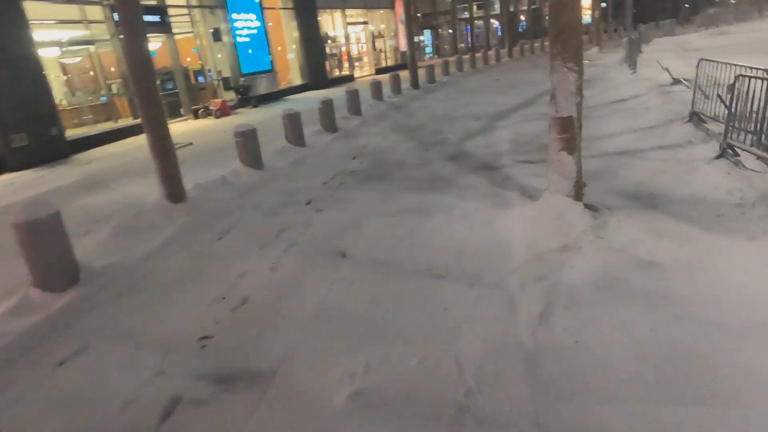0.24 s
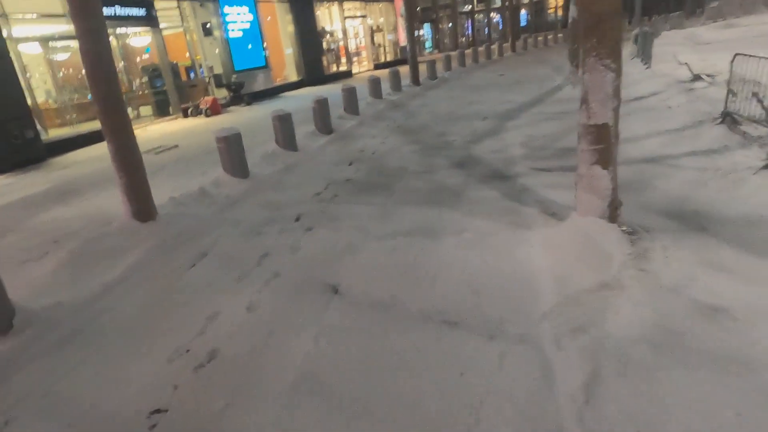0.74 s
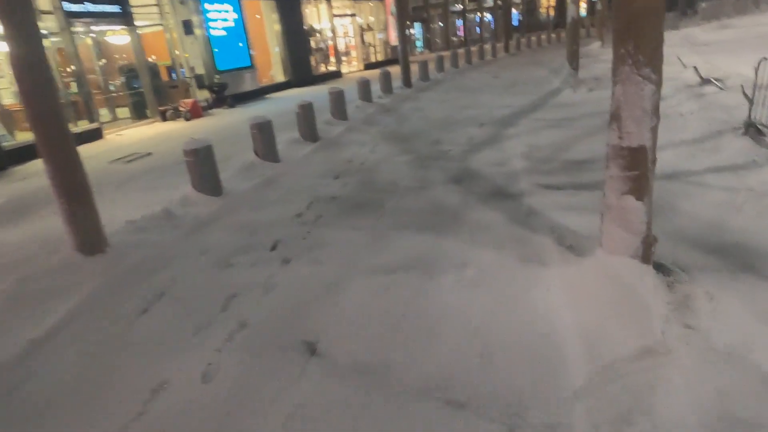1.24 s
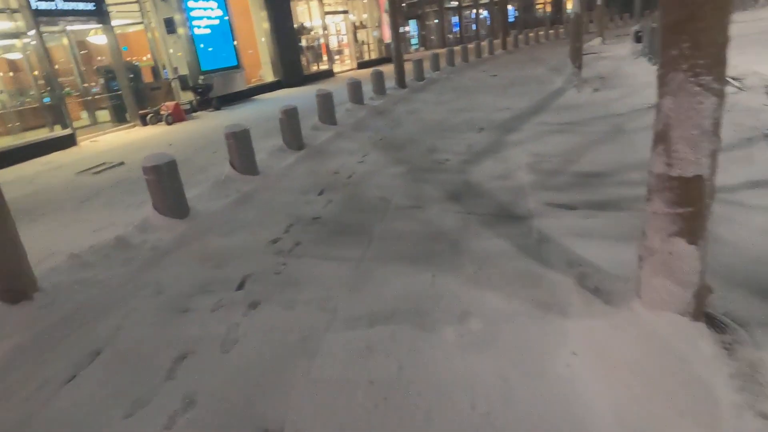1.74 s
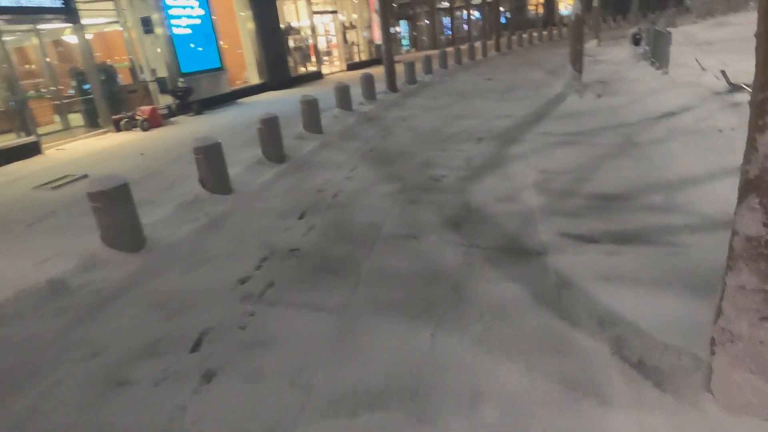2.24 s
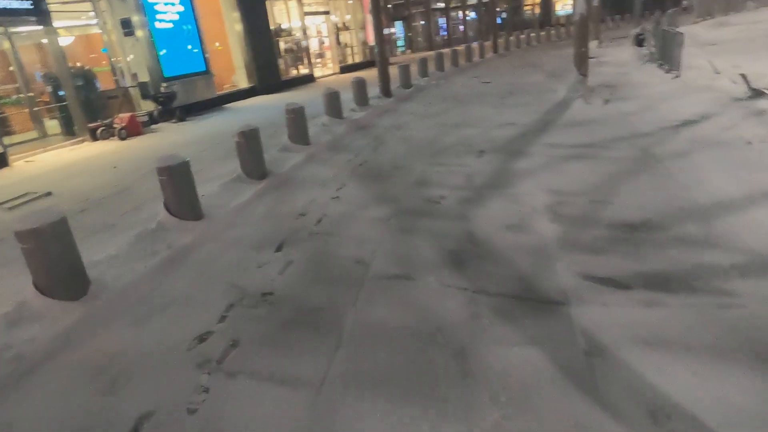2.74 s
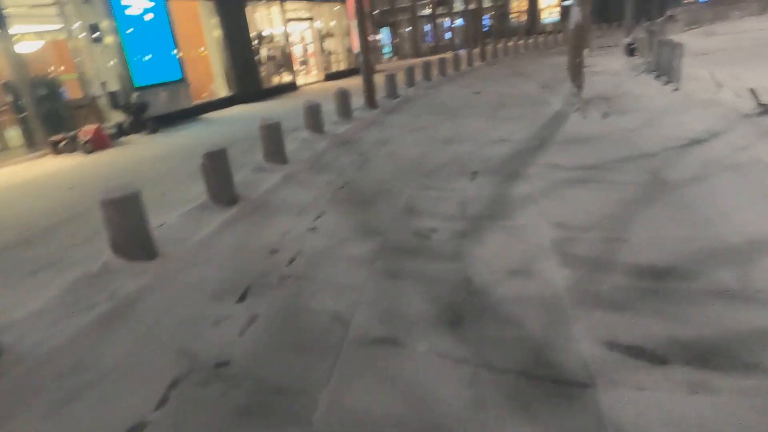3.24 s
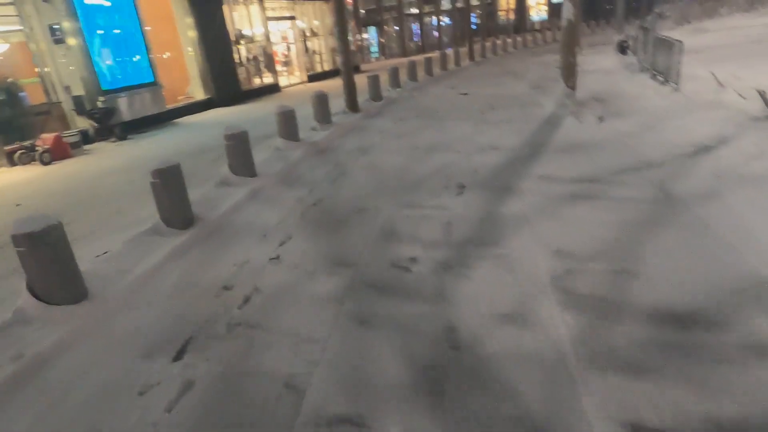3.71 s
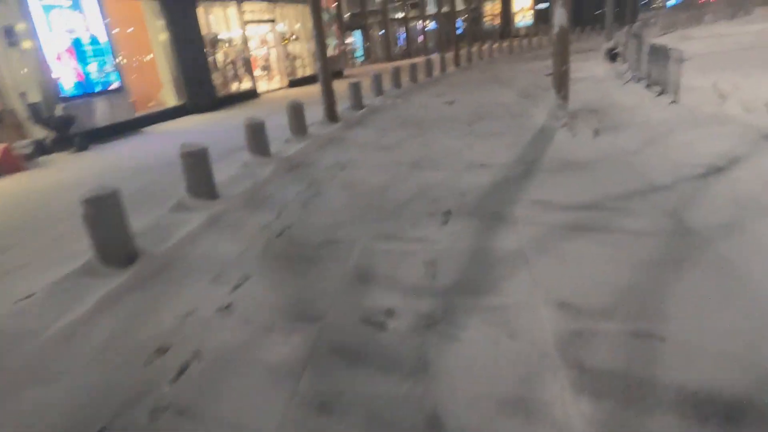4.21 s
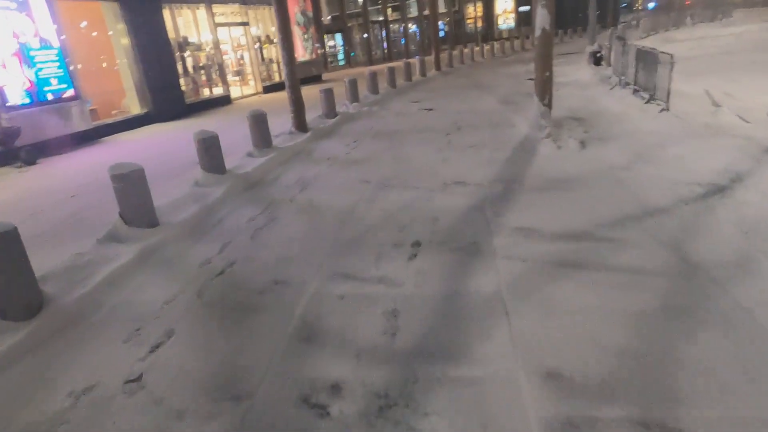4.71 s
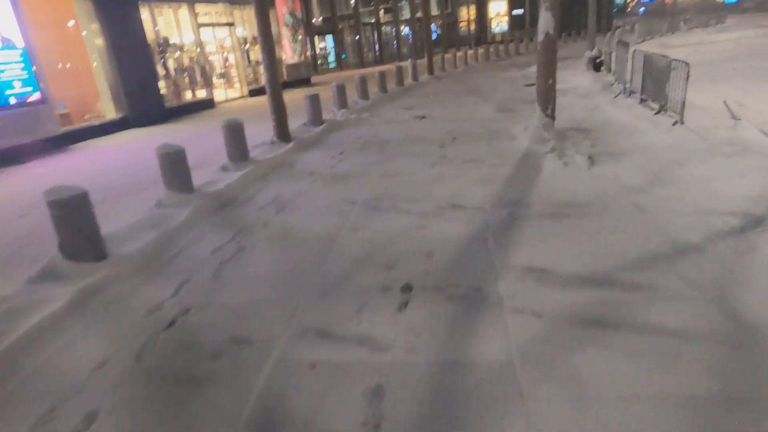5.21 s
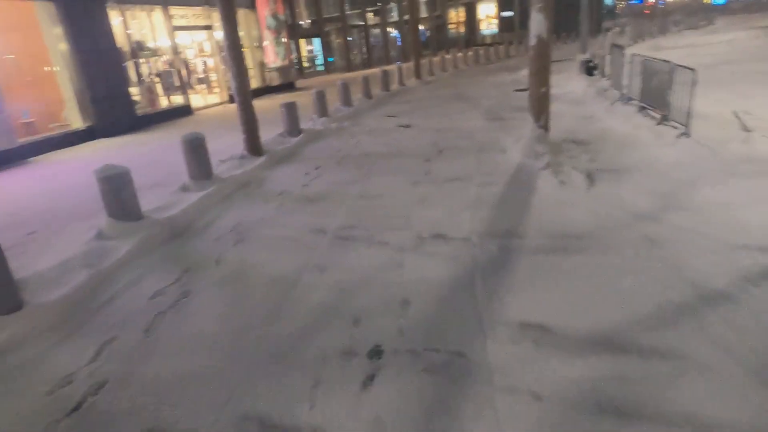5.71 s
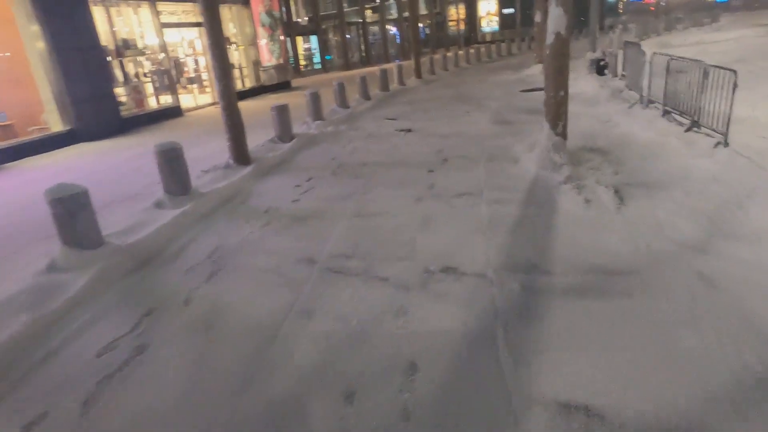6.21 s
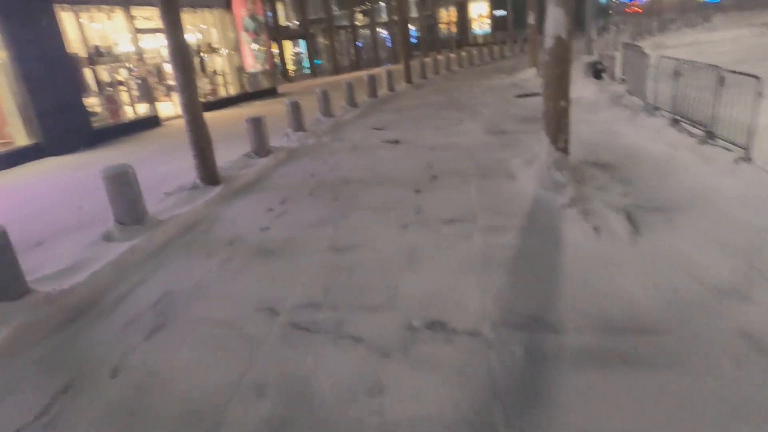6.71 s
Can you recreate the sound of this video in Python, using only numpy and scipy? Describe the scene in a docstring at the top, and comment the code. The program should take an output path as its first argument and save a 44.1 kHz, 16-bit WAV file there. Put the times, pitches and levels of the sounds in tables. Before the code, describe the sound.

Handheld stereo microphone, very close to the walker, outdoors on a quiet snowy street. Sub-bass thumps and rumble mark every half-second footfall, with smaller jolts between. Bright irregular clicks of breaking ice grains and soft powdery hiss fill the gaps, densest in the first four seconds, sparser around five, then livelier again. Distant city air stays barely audible.

```python
"""Someone walks over a snowy pavement on a quiet night street, microphone in hand.
In each stride the free foot first scuffs the snow and the moving hand rumbles; the footfall then jolts
the resonant grip with a deep thump, the sole crunches the snow, the heel knocks and the hand shakes.
Between footfalls come lesser jolts. Icy grains snap as filtered pulses and packed snow creaks in
decaying modes throughout, over shaped noise for the faint murmur of the city."""
import sys
import numpy as np
from scipy import signal
from scipy.fft import rfft, irfft, next_fast_len
from scipy.io import wavfile
from scipy.ndimage import uniform_filter1d

SR = 44100
rng = np.random.default_rng(int(sys.argv[2]) if len(sys.argv) > 2 else 0)


def store_wav(level_fs):
    """Save 16-bit WAV to argv[1]."""
    pcm = np.round(np.clip(np.atleast_2d(level_fs), -1, 1) * 32767)
    wavfile.write(sys.argv[1], SR, pcm.T.astype(np.int16))


N = 306495
TIME = np.arange(N) / SR

# Footfalls. Each row: time in seconds, thump level in dB, thump pitch in Hz, hand sway in dB, scuff of the
# swinging foot in dB, crunch under the sole in dB, heel knock in dB before a common gain,
# time constant of the thump's swell in seconds, shudder of the grip in dB.
FOOTFALLS = [(-0.022, -13, 27, -26.5, -59.5, -57.5, -36, 0.012, -25),
             (0.489, -8.5, 31.2, -35.5, -55, -53.5, -28, 0.014, -34),
             (1.011, -9.5, 33, -34, -65, -64, -32.5, 0.015, -30),
             (1.533, -7.5, 32, -33.5, -56.5, -58.5, -29.5, 0.014, -27.5),
             (2.036, -10, 29.2, -34.5, -65, -64, -36, 0.015, -32),
             (2.543, -9.5, 30.9, -30, -68, -64.5, -29.5, 0.014, -30),
             (3.048, -10, 29.8, -41, -57.5, -63, -33, .015, -24.5),
             (3.574, -10, 31.2, -36.5, -60.5, -59.5, -30.5, 0.015, -27),
             (4.086, -11, 28, -38, -65.5, -62.5, -38, 0.015, -28),
             (4.585, -8, 29.2, -29, -66, -67.5, -28.5, 0.013, -21.5),
             (5.069, -11.5, 31.1, -37.5, -72, -69, -39.5, 0.015, -26),
             (5.585, -8, 30.8, -32.5, -72.5, -61.5, -28.5, .015, -32),
             (6.081, -11.5, 27.9, -36, -68, -61, -32.5, 0.017, -28),
             (6.596, -8.5, 29.87, -39.5, -65, -57, -28, 0.016, -29.5)]
# Colour of close sounds in each microphone port. Each row: frequency in Hz, relative gain in dB.
LEFT_COLOUR = [(150, -25.5), (400, -9.5), (750, -6), (1000, 5.5), (1300, 15), (1800, 3), (2300, 2.5),
               (2900, 7), (4000, 4.5), (5500, -2), (7500, -5.5), (10000, -22), (12400, -19), (15500, -39)]
RIGHT_COLOUR = [(150, -10), (400, -9), (750, -7), (1000, -2), (1250, 10.5), (2000, 7.5), (3500, 9),
                (4500, 2.5), (6500, -9.5), (8800, -26), (12400, -24), (15500, -27.5)]
# Spectrum of handling rumble. Each row: frequency in Hz, relative density in dB per Hz.
HANDLING_COLOUR = [(12, -7.5), (22, 12), (34, 5.5), (52, -3), (80, -16), (120, -26.5), (200, -48),
                   (350, -53), (700, -61), (2000, -100)]
# Small breaks and slips follow the crunch: dB of rate or level per dB of crunch above the usual.
USUAL_CRUNCH_DB, RATE_FOLLOWS, LEVEL_FOLLOWS = -60.0, 0.62, 0.38


def from_db(db):
    """Amplitude ratio of a level in decibels."""
    return 10 ** (np.asarray(db) / 20)


def rms_one(x):
    """Normalise the root-mean-square value to one."""
    return x / np.sqrt(np.mean(x ** 2) + 1e-20)


def at_hz(points, hz):
    """Interpolate a spectrum along a logarithmic frequency axis."""
    f, value = np.transpose(points)
    return np.interp(np.log(np.maximum(hz, 1)), np.log(f), value)


def causal(gain):
    """Minimum-phase impulse response: folding the cepstrum forward makes a magnitude response causal."""
    cepstrum = irfft(np.log(gain))
    half = len(cepstrum) // 2
    cepstrum[1:half] *= 2
    cepstrum[half + 1:] = 0
    return irfft(np.exp(rfft(cepstrum)))[:half]


def colour(x, points, size=2048):
    """Linear filtering by convolution, with unit mean power gain."""
    gain = rms_one(from_db(at_hz(points, np.fft.rfftfreq(size, 1 / SR))))
    return signal.oaconvolve(x, causal(gain))[:N]


def noise(points):
    """Stationary Gaussian noise of unit rms, shaped in the frequency domain."""
    size = next_fast_len(N, True)
    gain = from_db(at_hz(points, np.fft.rfftfreq(size, 1 / SR)))
    return rms_one(irfft(rfft(rng.standard_normal(size)) * gain, size)[:N])


def drift(rate):
    """Slow random modulation of unit rms: noise averaged twice over 1 / rate seconds."""
    width = max(1, int(SR / rate))
    averaged = uniform_filter1d(rng.standard_normal(N), width)
    return rms_one(uniform_filter1d(averaged, width))


def add(out, s, sound):
    """Superpose a sound from time s, clipped to the length of the output."""
    start = int(round(s * SR))
    first, last = max(start, 0), min(start + sound.shape[-1], N)
    if last > first:
        out[..., first:last] += sound[..., first - start:last - start]


def pan_gains(pan_db):
    """Level difference between ports, positive to the left, at constant total power."""
    return rms_one(from_db([pan_db / 2, -pan_db / 2]))


def place(pair, pan_db, lag_s=.00058):
    """Level and arrival-time difference: the port nearer to a sound hears it louder and earlier."""
    # every off-centre sound has the same lag
    lag = int(round(lag_s * SR)) if pan_db else 0
    lags = (lag, 0) if pan_db < 0 else (0, lag)
    return np.array([g * np.pad(x, (d, lag - d)) for x, g, d in zip(pair, pan_gains(pan_db), lags)])


def phase_power(phase, times, levels_db):
    """Powers add: one stride phase with linear attack, hold and release at every footfall."""
    start, *lengths = phase
    corners = start + np.cumsum([0, *lengths])
    return sum((from_db(db) * np.interp(TIME, s + corners, [0, 1, 1, 0])) ** 2
               for s, db in zip(times, levels_db))


def thumps(lead_s=0.0366, order=4, early_s=0.013, sag_hz_per_s=35):
    """Transient response of a resonator: each footfall swells and dies in the soft arm and grip."""
    out, t = np.zeros(N), TIME[:SR // 3]
    since = t - early_s - lead_s   # time from a crest of the wave
    for s, db, hz, *_, swell_s, _ in FOOTFALLS:
        envelope = (t / (order * swell_s)) ** order * np.exp(order - t / swell_s)
        # the pitch sags as the grip relaxes
        cycles = (hz - .5 * sag_hz_per_s * since) * since
        add(out, s - early_s, from_db(db) * envelope * np.cos(2 * np.pi * cycles))
    return out


def shudders(after_s=0.0377, width_s=0.027, hz=52, spread_db=1.2):
    """A second, stiffer resonance of the grip: a Gaussian burst at a slightly different pitch each time."""
    out, t = np.zeros(N), TIME[:SR // 5] - .1
    envelope = np.exp(-.5 * (t / width_s) ** 2)
    for s, *_, db in FOOTFALLS:
        pitch = hz * from_db(rng.normal(0, spread_db))   # spread as 20 log10 of the frequency ratio
        add(out, s + after_s + t[0], from_db(db) * envelope * np.cos(2 * np.pi * pitch * t))
    return out


def heels(after_s=.027, hz=84, t60=0.12, gain_db=5.0, rise_s=0.0024, knock_db=-15.0):
    """Impact on a stiff surface: once the snow is pressed flat, the heel meets the pavement."""
    # Spectrum of the dull knock. Each row: frequency in Hz, relative density in dB per Hz.
    knock_colour = [(50, 9.5), (120, -7.5), (250, -7.5), (500, -22), (900, -21), (2000, -61)]
    out, t = np.zeros(N), TIME[:SR // 5]
    envelope = (1 - np.exp(-t / rise_s)) * from_db(-60 * t / t60)
    knocks = np.array_split(from_db(knock_db) * noise(knock_colour), len(FOOTFALLS))
    for (s, *_, heel_db, _, _), knock in zip(FOOTFALLS, knocks):
        pitch = hz * from_db(rng.normal(0, 1.0))
        blow = np.sin(2 * np.pi * pitch * t) + knock[:len(t)]
        add(out, s + after_s, from_db(heel_db + gain_db) * envelope * blow)
    return out


def bumps(width_s=0.023, gain_db=-3.0, rattle_db=-9.5):
    """Short excitation of a resonance: feet rolling and pushing off rock the grip, with a little rumble."""
    # Each row: time of the height in seconds, level in dB before a common gain, pitch in Hz.
    lesser_jolts = [(0.113, -18, 28.6), (0.426, -24, 29.4), (0.648, -28, 34.3), (0.849, -24.5, 31.7),
                    (1.181, -33.5, 29.2), (1.366, -24, 32.6), (1.457, -27.5, 36.3), (1.908, -26, 31.2),
                    (2.164, -17.5, 27.92), (2.226, -24.5, 28.8), (2.406, -24.5, 36.2), (2.707, -26, 27.8),
                    (3.013, -25, 26.2), (3.23, -34, 30.4), (3.501, -23.5, 29.6), (4.293, -22, 29.4),
                    (4.495, -21, 34), (5.261, -28, 30.2), (5.449, -27.5, 28.3), (5.755, -19.5, 29.03),
                    (5.926, -35, 31.5), (5.996, -25, 25.7), (6.273, -27.5, 27.6), (6.561, -23.5, 28.4)]
    out, t = np.zeros(N), TIME[:SR // 5] - .1
    envelope = np.exp(-.5 * (t / width_s) ** 2)
    rumbles = np.array_split(from_db(rattle_db) * noise(HANDLING_COLOUR), len(lesser_jolts))
    for (s, db, hz), rumble in zip(lesser_jolts, rumbles):
        rocking = np.cos(2 * np.pi * (hz * t + rng.random())) + rumble[:len(t)]
        add(out, s + t[0], from_db(db + gain_db) * envelope * rocking)
    return out


def sway(own_db=-14.5, gain_db=-1.5, settle_db=-14.5, rest_db=-41):
    """Amplitude-modulated handling noise: it rises as the arm swings and as it settles after each jolt."""
    # Each: start relative to the footfall, attack, hold and release, all in seconds.
    arm_swing = (-0.236, 0.085, 0.13, 0.32)
    arm_settle = (0, 0.02, 0.06, .16)
    s, thump_db, _, swing_db, *_ = np.transpose(FOOTFALLS)
    power = phase_power(arm_swing, s, swing_db) + phase_power(arm_settle, s, thump_db + settle_db)
    rumble = noise(HANDLING_COLOUR)
    # divide out the noise's own slow swells
    evened = rumble / np.sqrt(np.abs(uniform_filter1d(rumble ** 2, SR // 10)) + 1e-9)
    # moving air pushes on the two ports a little differently
    pair = evened + from_db(own_db) * noise(HANDLING_COLOUR) * [[1], [-1]]
    return from_db(gain_db) * pair * np.sqrt(power + from_db(rest_db) ** 2)


def crunch_level():
    """Energy sum of the work on the snow, in dB: a scuff before each footfall and a press that fades."""
    # Each: start relative to the footfall, attack, hold and release, all in seconds.
    foot_swing = (-0.25, .1, 0.07, .14)
    sole_press = (-0.041, .05, 0.04, .14)
    # Crunch that goes on between strides. Each row: time in seconds, level in dB.
    loose_snow = [(0.2, -70.5), (.6, -61), (.76, -69), (0.9, -63), (1.05, -67), (1.25, -61), (1.7, -61),
                  (2.1, -65.5), (2.7, -69), (2.82, -60), (2.97, -58), (3.2, -65), (3.4, -62), (3.85, -66),
                  (4.1, -62), (4.42, -63), (4.7, -77), (6.3, -76), (6.5, -64), (6.9, -67)]
    s, _, _, _, scuff_db, press_db, *_ = np.transpose(FOOTFALLS)
    strides = phase_power(foot_swing, s, scuff_db) + phase_power(sole_press, s, press_db)
    loose_db = np.interp(TIME, *np.transpose(loose_snow))
    return 10 * np.log10(strides + from_db(loose_db) ** 2)


def crunch(crunch_db, per_s=150, size_db=8.0, grains_db=-3.0, powder_db=-3.5, clump_db=4.0,
           crumble_s=0.0004):
    """Shot noise: countless tiny breaks, in clumps, over the smooth hiss of shifting powder."""
    # Loose powder is duller than breaking grains. Each row: frequency in Hz, relative level in dB.
    powder_colour = [(350, -2.5), (620, 12.5), (1000, 1), (1500, 4), (2200, 4), (3100, -2), (5500, -3),
                     (9000, -0.5), (15000, -7.5)]
    born = rng.random((2, N)) < per_s / SR
    sizes = from_db(size_db * np.minimum(rng.exponential(1, N), 3))
    decay = np.exp(-1 / (crumble_s * SR))
    breaks = signal.lfilter([1], [1, -decay], born * sizes + 1e-18)
    # each break is near one port and reaches the other more weakly
    grains = rms_one((breaks + .5 * breaks[::-1]) * rng.standard_normal((2, N)))
    powder = np.array([noise(powder_colour), noise(powder_colour)])
    level = from_db(crunch_db + clump_db * drift(55))
    return level * (from_db(grains_db) * grains + from_db(powder_db) * powder)


def give_way(per_s, crunch_db, count, clump_db=5.0, clumps_per_s=22):
    """Accumulated strain: snow gives way in little clusters, sooner the harder it is worked (samples)."""
    pace_db = RATE_FOLLOWS * (crunch_db - USUAL_CRUNCH_DB) + clump_db * drift(clumps_per_s)
    strain = np.cumsum(per_s * from_db(pace_db)) / SR
    return np.searchsorted(strain, np.arange(count) + rng.uniform(0, 1.8, count))


def small_grains(crunch_db, per_s=52.0, usual_db=-30, spread_db=4.5, tilt_db=-2.5, tilt_spread_db=1.5,
                 pan_db=-1, pan_spread_db=3, low_hz=2800, high_hz=7800, count=700):
    """Random fracture under strain: small grains break one by one, as rows for ticks()."""
    ring_hz = low_hz * (high_hz / low_hz) ** rng.random(count)
    at = give_way(per_s, crunch_db, count)
    strength = rng.uniform(-1, 1, count)
    tilt, pan = rng.standard_normal((2, count))
    level_db = usual_db + LEVEL_FOLLOWS * (crunch_db - USUAL_CRUNCH_DB)
    return [(i / SR, level_db[i] + spread_db * strength[k], tilt_db + tilt_spread_db * tilt[k],
             ring_hz[k], pan_db + pan_spread_db * pan[k]) for k, i in enumerate(at) if i < N]


def ticks(grains, gain_db=-1.48, crumble_db=6.0, crumble_t60=0.015, clean_per_db=1.02, ring_db=6.5,
          ring_octaves=0.37, ripple_db=1.77, size=1024):
    """Impulse response: a grain breaks with a sharp pulse and brief crumble, and rings at its own pitch."""
    out, t = np.zeros((2, N)), TIME[:size]
    hz = np.fft.rfftfreq(size, 1 / SR) + 1
    ports = np.array([rms_one(from_db(at_hz(port, hz))) for port in (LEFT_COLOUR, RIGHT_COLOUR)])
    octaves = np.log2(np.clip(hz, 1200, 9000) / 3100)
    knots = np.linspace(octaves[0], octaves[-1], 16)
    for s, db, tilt_db, ring_hz, pan_db in grains:
        crumble = rng.standard_normal((2, size)) * from_db(-60 * t / crumble_t60)
        crumble /= np.linalg.norm(crumble, axis=1, keepdims=True)
        # grains right next to a port are nearly pure pulses
        burst = crumble * from_db(crumble_db - clean_per_db * abs(pan_db)) + (t == 0)
        # each grain has its own brightness, resonance and random ripple
        resonance = np.exp(-.5 * (np.log2(hz / ring_hz) / ring_octaves) ** 2)
        ripple = np.interp(octaves, knots, rng.standard_normal(len(knots)))
        shape = from_db(tilt_db * octaves + ring_db * resonance + ripple_db * ripple)
        pair = [signal.fftconvolve(b, causal(port * shape)) for b, port in zip(burst, ports)]
        snap = place(pair, pan_db)
        # the level sets the mean energy of the two ports
        add(out, s, from_db(db + gain_db) * snap * np.sqrt(2) / np.linalg.norm(snap))
    return out


def small_creaks(crunch_db, per_s=5.0, usual_db=-50, spread_db=1.0, usual_hz=1400, pitch_spread_hz=90,
                 pan_spread_db=1.0, t60=0.0084, count=90):
    """Stick-slip by chance: faint slips, more frequent as the snow is worked, as rows for creaks()."""
    at = give_way(per_s, crunch_db, count)
    level_db = usual_db + LEVEL_FOLLOWS * (crunch_db - USUAL_CRUNCH_DB)
    return [(i / SR, level_db[i] + spread_db * size, usual_hz + pitch_spread_hz * pitch,
             pan_spread_db * pan, t60)
            for i, (size, pitch, pan) in zip(at, rng.standard_normal((count, 3))) if i < N]


def creaks(slips, gain_db=-5.0, rise_s=0.0017, rough=0.092, lag_s=0.00013):
    """Modal synthesis: packed snow slips and a few close, hollow modes ring out."""
    # Each row: multiple of the creak's pitch, relative level in dB.
    creak_modes = [(.9, -14.5), (0.999, -4), (1.14, -17.5), (1.35, -17.5)]
    out, t = np.zeros((2, N)), TIME[:SR // 10]
    for s, db, hz, pan_db, t60 in slips:
        tone = sum(from_db(mode_db) * np.sin(2 * np.pi * hz * ratio * t + rng.normal(0, 1.0))
                   for ratio, mode_db in creak_modes)
        grit = rms_one(uniform_filter1d(rng.standard_normal((2, len(t))), SR // 1500))
        envelope = (1 - np.exp(-t / rise_s)) ** 2 * from_db(-60 * t / max(t60, .005))
        ring = tone * (1 + rough * grit) * envelope
        # scaled by the spread of the first 12 ms
        left, right = ring / np.std(ring[:, :SR * 12 // 1000]) * from_db(db + gain_db)
        left_gain, right_gain = pan_gains(pan_db)
        add(out[0], s, left_gain * left)
        add(out[1], s + lag_s, right_gain * right)
    return signal.sosfilt(signal.butter(4, 900, "high", fs=SR, output="sos"), out)


def squeaks(crunch_db, per_s=70, t60=0.014, low_hz=1080, high_hz=1900):
    """Impulse-driven two-pole resonators: many tiny slips in the crunch ring at hollow pitches."""
    out, pitches = np.zeros((2, N)), np.geomspace(low_hz, high_hz, 7)
    r = from_db(-60 / (t60 * SR))   # pole radius
    for hz in pitches:
        slips = np.zeros((2, N))
        at = rng.integers(0, N, int(per_s * N / SR / len(pitches)))
        slips[:, at] = rng.standard_normal((2, len(at)))
        poles = [1, -2 * r * np.cos(2 * np.pi * hz / SR), r * r]
        out += signal.lfilter([1, 0, -1], poles, slips + 1e-18) / hz
    return rms_one(out) * from_db(crunch_db)


def street(level_db=-56.5, waver_db=1.0):
    """Interchannel correlation: far city murmur, alike in the bass and partly opposed in the treble."""
    # Each row: frequency in Hz, relative density in dB per Hz.
    street_colour = [(60, -16), (120, -7), (200, -13), (320, -21), (520, -30.5), (800, -32), (1000, -20.5),
                     (1220, -10), (1450, -16), (1700, -17.5), (2200, -20.5), (3300, -26.5), (5000, -44),
                     (8000, -54.5), (15000, -58)]
    # Each row: frequency in Hz, correlation of left and right from -1 to 1.
    likeness = [(60, 0.86), (210, 0.94), (400, 0.7), (720, 1), (1340, -0.33), (2500, -0.49), (4600, -0.08)]
    size = next_fast_len(N, True)
    hz = np.fft.rfftfreq(size, 1 / SR)
    mid, side = rfft(rng.standard_normal((2, size)))
    alike = np.clip(at_hz(likeness, hz), -1, 1)
    pair = np.sqrt(1 + alike) * mid + np.sqrt(1 - alike) * side * [[1], [-1]]
    air = rms_one(irfft(pair * from_db(at_hz(street_colour, hz)), size)[:, :N])
    return air * from_db(level_db + waver_db * drift(20.3))


def scene(body_pan_db=1.1):
    """Superposition of body rumble, snow sounds through the two ports and the street."""
    # Distinct snaps of icy grains. Each row: time in seconds, level in dB before a common gain,
    # brightness in dB per octave, ring in Hz, left-minus-right level in dB.
    icy_snaps = [(0.0575, -4.5, 4, 2400, -9), (0.1099, -27.5, 3, 4500, 4), (0.2362, -13.5, 0.5, 2880, -4),
                 (0.2744, -26.5, 5, 3400, -7), (0.309, -11.5, 5, 1780, -0.5), (0.338, -18, 4, 3400, 3),
                 (0.3549, -15.5, 2, 1400, -12), (0.3611, -17, 7, 2900, -1), (0.3667, -13.5, 5, 1400, -6.5),
                 (0.389, -29, 3, 3000, 1), (0.4288, -26, 4, 3400, 5), (0.4632, -16.5, -5.5, 6000, -1.5),
                 (0.4904, -18.5, -5, 2700, 0.5), (0.5091, -14, 5.5, 1400, -1.5),
                 (0.5197, -12.5, -1, 3680, -11), (0.5359, -4.5, -0.5, 2720, -0.5),
                 (0.5811, -24, -5, 3400, -4), (0.5978, -18, 0, 4300, 0), (0.6124, -11.5, 2, 3660, -8.5),
                 (0.6223, -12, -1, 3970, -3), (0.6452, -20, 3, 3340, -16), (0.6582, -23, 2, 4500, 0),
                 (0.6771, -14.5, 11.5, 4440, -1), (0.6995, -12.5, -9, 3700, -1.5),
                 (0.7604, -19.5, 0.5, 5500, 5), (0.8368, -18.5, -2, 2900, 0), (0.862, -22.5, 3, 5500, 2),
                 (0.9233, -26, 1, 3400, -10), (0.9556, -15, 2.5, 4700, -7), (0.9735, -18.5, -2, 5100, -0.5),
                 (0.9819, -17.5, 3, 1400, 15), (1.0014, -16.5, -0.5, 4280, -23),
                 (1.0535, -26.5, 8, 5500, -5), (1.0876, -4, -14.5, 1800, 4.5), (1.1111, -19, -2, 2700, 5),
                 (1.1264, -12.5, -2, 9000, -1.5), (1.1453, -27, -3, 4000, 2), (1.1678, -22, -3, 9000, 3),
                 (1.1816, -12, 1, 5140, -1.5), (1.2656, -14.5, -15, 2700, 3), (1.28, -27, 0, 5000, -6),
                 (1.3246, -13, -1.5, 6500, -0.5), (1.3711, -13, -7.5, 3100, 2),
                 (1.3891, -17.5, 0.5, 6000, 0), (1.3999, -18, -10, 3000, 7), (1.433, -16.5, -5, 2700, 6),
                 (1.4412, -9.5, 1, 4300, -21), (1.4469, -17.5, 10.5, 3100, 0.5), (1.4598, -15, 2, 2907, -9),
                 (1.4865, -22, 7, 3000, -6), (1.5013, -23, 2, 3700, 1), (1.5288, -21, -5, 3400, -13),
                 (1.5364, -10.5, 6, 1950, -1), (1.6119, -13, 3, 2660, -2.5), (1.6402, -24, 8, 4300, 18),
                 (1.6478, -17, 1, 5100, -18), (1.6944, -19, 5, 3140, 1), (1.7129, -23, 1, 3400, -2),
                 (1.7221, -22, 6, 4500, -8), (1.7331, -15, -1, 5140, 3), (1.7404, -19, -1, 4000, -2),
                 (1.7566, -19.5, 6, 2500, -5), (1.7663, -17.5, -4, 2700, 2), (1.7883, -17, 0, 9000, 1),
                 (1.817, -14, 4.5, 2920, 0), (1.8837, -14.5, 5, 1600, -0.5), (1.8932, -19, 6, 2500, -13),
                 (1.899, -21, 3.5, 1800, 12), (1.9376, -16.5, -1.5, 9000, 2), (1.9461, -21, 1, 3100, 2),
                 (1.9716, -21, -7, 2926, -5), (1.9953, -14, 2.5, 1790, 2), (2.0033, -14.5, -5.5, 2900, 2.5),
                 (2.0455, -15.5, -3, 9200, -7), (2.111, -20.5, 2.5, 9050, -0.5),
                 (2.1518, -12.5, 2.5, 2500, -4.5), (2.1857, -19, 2, 3420, 3), (2.2436, -24, 6, 3420, -1),
                 (2.2684, -17, -4, 4700, -0.5), (2.281, -15, 3, 2090, 0), (2.4107, -12.5, 1, 2100, 0),
                 (2.4304, -20.5, -3.5, 2540, 3), (2.4539, -29, 8, 3360, -2),
                 (2.5017, -15.5, 2.5, 3070, 0.5), (2.5787, -8, -2, 8200, -8.5), (2.63, -23.5, 0, 4700, -22),
                 (2.7124, -23.5, -3.5, 4500, 6), (2.761, -23, -4, 2500, -2.5), (2.7811, -14.5, 1, 2700, 8),
                 (2.7905, -8.5, 0.5, 2300, -11), (2.7997, -24, 2, 2700, -20), (2.8332, -8.5, 2, 5100, 2),
                 (2.8766, -19, 5, 2900, 1), (2.8867, -15, 1.5, 4000, 7), (2.8989, -17, 4.5, 1400, -5),
                 (2.915, -20, 1, 1900, -13), (2.9395, -26, 4, 5000, 1), (2.9682, -23, 0, 4050, -7),
                 (3.0077, -19, 2.5, 2500, -15), (3.0457, -30, 1, 4024, -1), (3.0712, -14, 1, 1910, -6),
                 (3.248, -26, 0, 3400, -1), (3.2767, -15.5, 4, 2310, -9), (3.29, -24, 6, 5100, -5),
                 (3.3104, -16.5, 3.5, 1400, -1), (3.3202, -11, 1.5, 5540, 1.5), (3.3591, -23, 0, 3370, -6),
                 (3.4312, -26, 7, 3100, -12), (3.4426, -17.5, -1.5, 4700, 0.5), (3.4549, -20, 5, 2700, -21),
                 (3.4795, -19.5, 4.5, 4300, -4), (3.4919, -19.5, -2, 6010, -7), (3.4972, -24, -1, 4040, -4),
                 (3.5656, -22.5, -13, 2000, -4), (3.5729, -23, -10, 2000, 0.5),
                 (3.5787, -18.5, -9, 2280, -0.5), (3.5842, -17, 2.5, 2095, -7.5),
                 (3.6164, -22, -7, 1890, -10), (3.6342, -15, -3.5, 1910, -1.5),
                 (3.657, -19.5, -5.5, 9050, -1), (3.6928, -19.5, 5, 1400, -0.5),
                 (3.7189, -17, -3, 9000, -7), (3.7367, -10.5, 2, 2700, -11.5), (3.7701, -26, 6, 4470, -7),
                 (3.7831, -14, 3.5, 3370, -6.5), (3.8685, -21, 1, 3400, -4), (3.9127, -13.5, 2.5, 2150, -9),
                 (3.947, -14, 1, 3400, -1), (3.9636, -26, 4, 6500, 1), (3.9844, -5.5, 3, 2200, -8),
                 (4.0418, -19, -4.5, 3694, 3), (4.0982, -20.5, 6.5, 2900, 0.5),
                 (4.1045, -13.5, -3, 1800, 6), (4.1156, -24, 0, 2700, -6), (4.1591, -29, 5, 4500, 0),
                 (4.1833, -6, 2.5, 2750, -12), (4.2377, -21, 2, 9000, -4), (4.2677, -23.5, 1, 3400, -3),
                 (4.2802, -27, -2, 3004, 2), (4.3734, -20.5, 0, 3370, 2), (4.3829, -12.5, -3.5, 3130, 1),
                 (4.4107, -9.5, 2, 2300, -24), (4.4255, -12, 1, 2900, -3), (4.4323, -15, 0, 5100, 5),
                 (4.5305, -15.5, 5, 3400, -11), (4.6293, -23.0, -5, 5520, -16),
                 (4.6494, -24.5, -10, 2310, -2), (4.829, -25.5, 0.5, 3940, 1), (4.855, -28, 6, 5500, -7),
                 (4.866, -27, -1, 4000, -10), (4.9045, -36, 9, 5500, 8), (4.9945, -30.5, 7, 4550, -2),
                 (5.0355, -22.5, -1.5, 4270, 1), (5.1638, -18.5, -6.5, 9100, -2),
                 (5.1695, -27.5, 4, 8100, -1), (5.1764, -32, 5, 4070, -4), (5.239, -24, 2.5, 5600, -1),
                 (5.3189, -24, 2, 5510, -1), (5.45, -13.5, 0, 3100, -22), (5.5175, -23, 2.5, 3420, -5),
                 (5.5926, -25, 5, 3120, -2), (5.6659, -13, -0.5, 2100, -0.5), (5.6742, -14, -3, 9000, -10),
                 (5.692, -15.5, -7, 2300, 0), (5.7139, -14, 0.5, 5000, -13), (5.748, -22, 4.5, 5100, -1),
                 (5.8367, -16.5, 2.5, 4770, 5.5), (5.8506, -21.5, 3, 3400, 0), (5.9104, -27.5, 4, 6420, 2),
                 (5.932, -25, 5, 5440, -5), (5.946, -23.5, 7, 3400, -4), (6.0363, -23.0, 2.5, 4395, 3),
                 (6.0838, -37, -4, 4040, -3), (6.1199, -17, -1, 2000, 1.5), (6.1391, -24, -1, 3970, 0.5),
                 (6.1493, -23, -7, 1993, -0.5), (6.2682, -25, -12, 2500, -4), (6.3797, -25, -1, 3400, -1),
                 (6.4068, -24, 4, 5060, 0.5), (6.4112, -16.5, -1, 1790, 5), (6.4195, -21, -1, 1894, -8),
                 (6.4776, -15, 5.5, 3800, -1.5), (6.5267, -22, -2, 3430, -8),
                 (6.5413, -10.5, 0.5, 2480, -20), (6.5659, -24, -1, 2700, -3),
                 (6.5791, -17.5, -1, 3700, -8), (6.6016, -15.5, 1.5, 4700, -12), (6.6189, -16, 0, 8250, -8),
                 (6.6626, -22.5, 0.5, 9000, -8), (6.6817, -31, -1, 6450, 1), (6.6912, -21, -3, 4500, 4),
                 (6.7517, -18.5, 3.5, 5500, -1), (6.7575, -21, 7, 4700, -28), (6.764, -21, 6, 2300, -6),
                 (6.8061, -18, -2, 9000, 0), (6.8849, -18, 2, 2280, -11), (6.9402, -18, -4, 3380, -3)]
    # Short hollow creaks. Each row: time in seconds, level in dB before a common gain, pitch in Hz,
    # left-minus-right level in dB, 60 dB decay time in seconds (at least 0.005 is used).
    hollow_creaks = [(0.126, -37.5, 1260, 3, 0.0043), (0.33, -34.5, 1450, -1, 0.0093),
                     (.635, -40.5, 1250, 3, 0.017), (0.6765, -23.5, 1228, -3.5, 0.041),
                     (.728, -43, 1580, -3, 0.032), (1.0878, -29, 1248, 1, 0.016),
                     (1.264, -43, 1120, -1, 0.029), (1.5, -35.5, 1360, 7.5, 0.013),
                     (1.536, -35.5, 1570, -5, 0.0057), (1.597, -38, 1220, 1, 0.023),
                     (2.578, -41.5, 1210, 2, 0.014), (2.721, -39, 1175, 4, 0.011),
                     (2.8865, -33.5, 1228, -8, 0.044), (3.723, -37, 1240, 4, 0.024),
                     (5.04, -47.5, 1400, -2, .02), (5.666, -39.5, 1165, 8, 0.017),
                     (5.676, -40.5, 1250, 6, 0.026), (6.1195, -36, 1324, 4, 0.012),
                     (6.239, -38.5, 1360, -1, 0.0059), (6.806, -41, 1250, 2, 0.012),
                     (6.945, -23, 1347, 3, 0.045)]
    crunch_db = crunch_level()
    body = thumps() + shudders() + bumps() + heels() + sway()
    body = body * from_db([[body_pan_db / 2], [-body_pan_db / 2]])
    left, right = crunch(crunch_db)
    snow = np.array([colour(left, LEFT_COLOUR), colour(right, RIGHT_COLOUR)])
    snaps = ticks(list(icy_snaps) + small_grains(crunch_db))
    slips = creaks(list(hollow_creaks) + small_creaks(crunch_db)) + squeaks(crunch_db)
    return body + snow + snaps + slips + street()


def record(dry, cutoff_hz=16000):
    """Chebyshev low-pass filtering: the top is cut steeply, 70 dB down from the cutoff upwards."""
    return signal.sosfilt(signal.cheby2(12, 70, cutoff_hz, fs=SR, output="sos"), dry)


dry = scene()
out = record(dry)
store_wav(out)
```